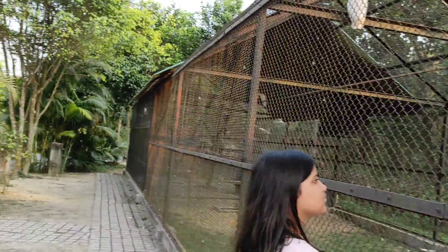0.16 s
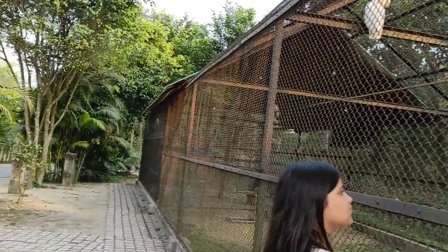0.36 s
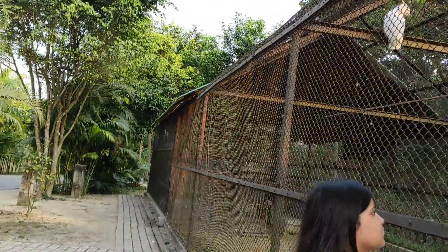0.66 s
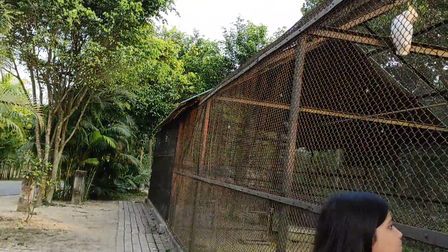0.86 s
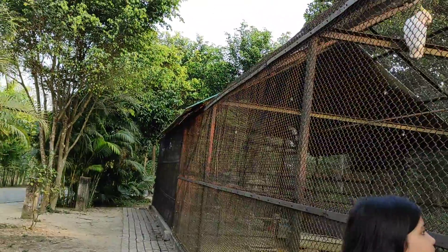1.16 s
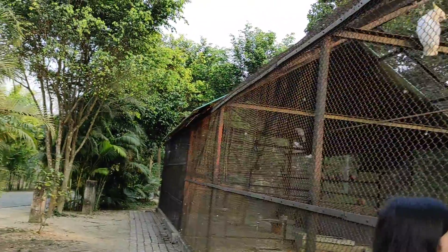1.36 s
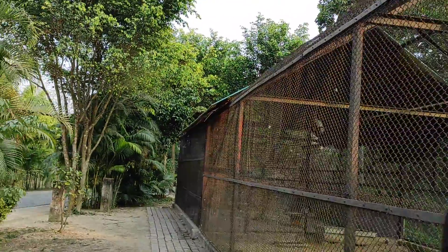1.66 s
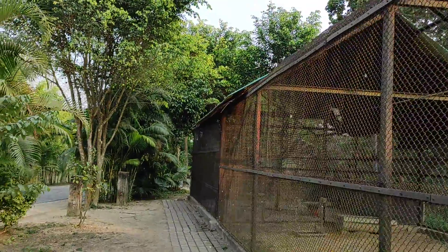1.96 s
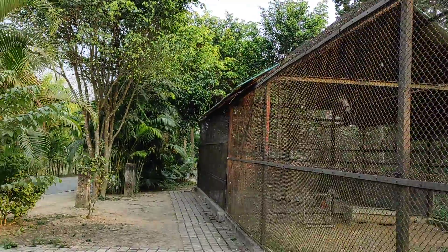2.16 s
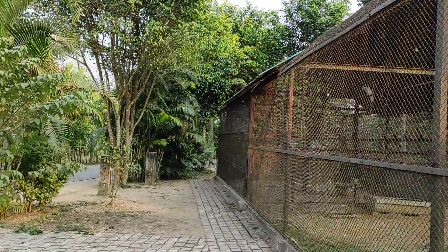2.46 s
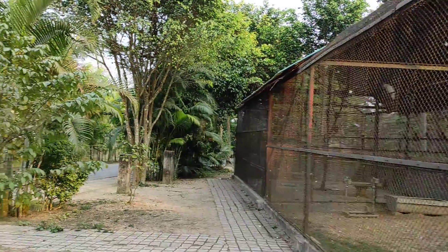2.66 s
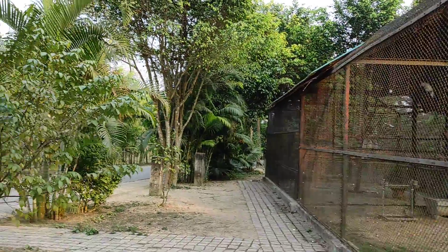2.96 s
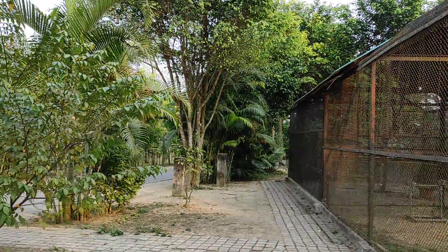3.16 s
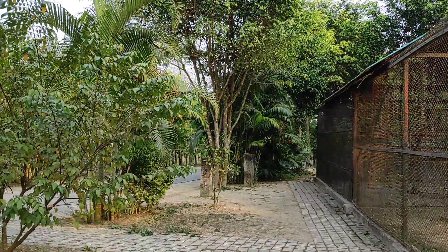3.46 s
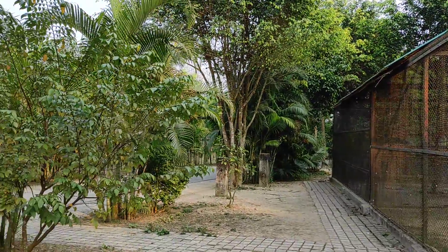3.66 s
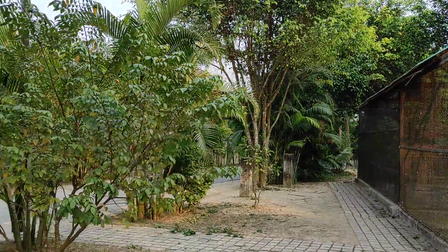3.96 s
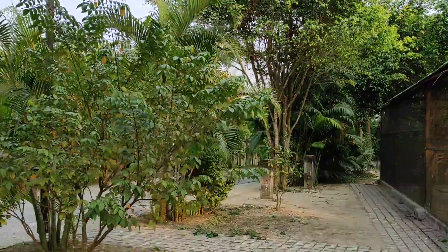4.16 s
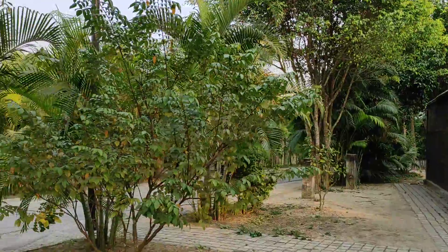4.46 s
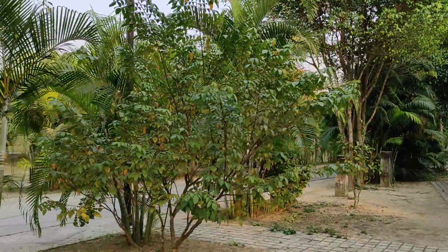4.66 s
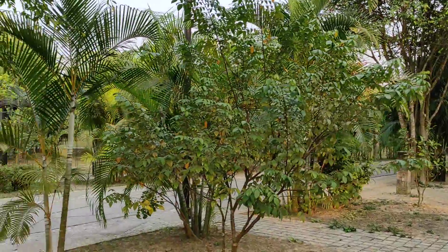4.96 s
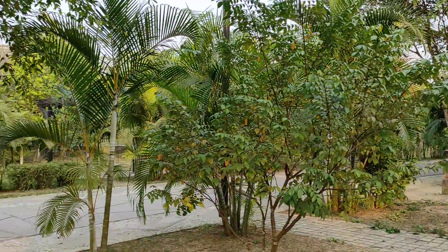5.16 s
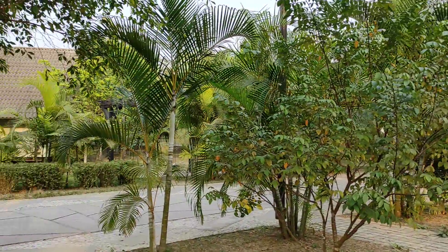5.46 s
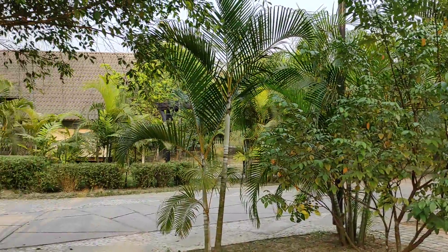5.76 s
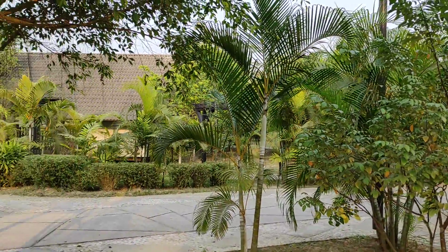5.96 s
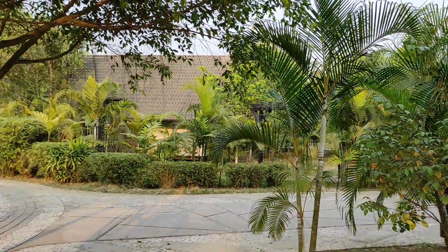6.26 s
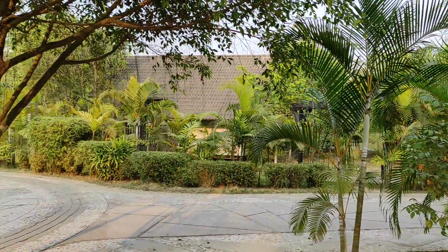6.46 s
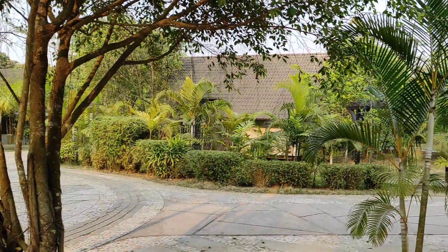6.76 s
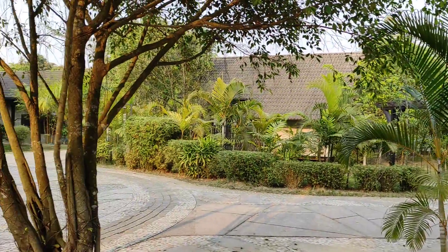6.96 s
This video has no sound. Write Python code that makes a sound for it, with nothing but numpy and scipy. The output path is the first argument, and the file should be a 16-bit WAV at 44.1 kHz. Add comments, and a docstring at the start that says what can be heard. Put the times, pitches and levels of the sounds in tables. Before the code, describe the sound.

In an outdoor aviary beside a garden, a large parrot gives one rising, raspy squawk, then after a pause repeats short, harsh two-step squawks about every three-quarters of a second. Small birds chirp briefly early on. Close dry ticks and one sharp snap come from right at the stereo microphone. Distant traffic, light wind and a faint far flock lie quietly underneath.

```python
"""An outdoor aviary with a garden around it, heard through the two microphone ports of a panning camera.
A parrot squawks (rasping scoop, high note, jump down, falling glide): harmonics and puffed noise, throat-filtered.
Small birds chirp in gliding harmonics. Close to the camera, ticks are noise bursts over a low thump
and one sharp snap is a handful of brief rings. Sparse echoes answer from cage, paving and trees.
Far off lie traffic, wind, a chattering flock and garden hiss, all shaped noise, and faint wavering tones."""
import sys
import numpy as np
from scipy import signal
from scipy.fft import rfft, irfft
from scipy.io import wavfile
from scipy.ndimage import uniform_filter1d

SR = 44100
rng = np.random.default_rng(int(sys.argv[2]) if len(sys.argv) > 2 else 0)


def file_out(sig):
    """Save sig as 16-bit WAV at sys.argv[1]."""
    # one column per channel
    cols = np.atleast_2d(sig).T
    # limit, then scale
    lim = np.clip(cols, -1, 1)
    pcm = np.round(lim * 32767).astype(np.int16)
    wavfile.write(sys.argv[1], SR, pcm)


N = 313110  # samples

# Parrot's throat, as heard: [f/Hz, relative level/dB]
THROAT = [(410, -75), (700, -28), (1460, -26.5), (1820, -21.5), (2560, -9.5), (3410, -4.5), (4800, -8.5),
          (5190, -10), (8760, 2), (10100, -12), (12200, -15.5), (13100, -34.5), (16000, -22)]
# First call, climbing to its note: [t/s, pitch f/Hz, level/dB before the port trim, noise re tone/dB,
# brightness/dB per harmonic]
FIRST_CALL = [(0.158, 1288, -57, 4, -8), (0.18, 1367, -44.5, 3.5, -7), (0.218, 1660, -42.5, 1, -9),
              (0.225, 1685, -39, -24.5, -5.5), (0.298, 1782, -35.5, -25.5, -4),
              (0.331, 2203, -37, -14.5, -4.5), (0.37, 2378, -34.5, -14.5, -5.5),
              (0.39, 2284, -28.5, -12, -4), (0.416, 2049, -25.5, -4, 2), (0.445, 1699, -23, -2, -4),
              (0.466, 1521, -39, 2, -1.5)]
# Short rasps: [start t/s, length/s, pitch f/Hz, level/dB before the port trim]
RASPS = [(1.097, 0.01105, 4160, -37), (1.108, 0.021, 4300, -36.5), (1.371, .1, 3050, -38.5),
         (1.487, 0.04, 2930, -45)]
RASP_NOISE_DB, RASP_TILT_DB, RASP_FADE_DB = 2, -1.5, -13  # noise re tone, dB per harmonic, level at the end
# Squawks: [start t/s; lengths/s of scoop, high note, held note, fall; f/Hz of high note, held note, end;
# level/dB before the port trim of scoop, high entry, high top, held note, fall;
# extra brightness of both notes/dB per harmonic]
SQUAWKS = [(2.852, 0.027, .03, .068, .092, 2475, 2351, 1500, -29.5, -33.5, -27, -28, -22, 1.32),
           (3.73, 0.039, .027, 0.051, 0.096, 3215, 2299, 1430, -27.5, -44, -26.5, -28, -22.5, 0.6),
           (4.475, 0.033, .032, 0.035, .084, 3283, 2332, 1451, -28, -31.5, -25, -27, -23.5, 0.94),
           (5.386, .055, 0.035, .034, .08, 3301, 2355, 1423, -29, -32.5, -22.5, -29.5, -23, -0.17),
           (6.198, .034, 0.036, 0.04, 0.077, 3270, 2321, 1524, -29.5, -35, -31, -32, -25, 0.042),
           (6.986, 0.034, .029, 0.058, .08, 3300, 2195, 1500, -29, -39, -32, -29.5, -24, 0.3)]
# Noise re tone by part of the squawk: [level/dB]
NOISE_DB = {"scoop": 2.0, "snap": -10, "high": -22, "held": -26, "break": -14, "fall": -7.5}
# Brightness by part of the squawk: [dB per harmonic]
TILT_DB = {"scoop": -2.5, "snap": -2.5, "high": -6, "held": -5, "break": -0.5, "fall": -1.2}
# The scoop is a low rasp that snaps up at its end; its levels are relative to the scoop level
SCOOP_FROM_HZ, SCOOP_TO_HZ, SNAP_UP_S = 800, 980, 0.013
SCOOP_ATTACK_S, SCOOP_START_DB, SCOOP_RISE_DB, SCOOP_END_DB = 0.007, -23.5, -13.5, -4.5
JUMP_S = 0.003
HIGH_SAG, HELD_RISE_DB, HELD_SAG = 0.1, -3, 0.015  # notes swell while their pitch sags by a share
# Levels relative to the fall level; peak and end of hold as shares of the fall's length
FALL_ENTRY_DB, FALL_PEAK, FALL_HOLD, FALL_END_DB = 0.5, 0.409, 0.804, -17
FALL_BEND = 1.35  # exponent above 1: the glide starts gently and steepens

# Small birds: [start t/s, length/s, from f/Hz, to f/Hz, level/dB of harmonics 1, 2, 3 before trims]
CHIRPS = [(1.104, 0.024, 4544, 3705, -52, -67, -78), (1.193, 0.029, 3617, 3843, -45, -37, -48),
          (1.222, 0.0289, 3910, 3140, -44, -37.5, -53), (2.324, .07, 1890, 1970, -66, -67, -80),
          (1.36, 0.015, 1708, 1945, -56, -70, -53), (1.427, 0.061, 2280, 2410, -55, -52, -61),
          (1.482, 0.028, 2570, 2840, -54, -50, -48)]
# Lead of the left port as the camera turns: [t/s, lead/samples]
BIRD_LEAD = [(0, 20.7), (4.5, 18.6), (5.5, 13.1), (6.2, 8.8), (7.1, 4.3)]
# Balance of the birds, before a fixed lean to the left: [t/s, left-right/dB]
BIRD_PAN = [(0.3, -2.5), (1.4, -7), (2.9, -1), (4.5, -2.5), (5.9, -3), (7.1, -2)]

SNAP_S = 0.8884
# Rings of the sharp snap: [f/Hz, left level/dB, right level/dB, half length to 1/e/ms]
SNAP = [(553, -29, -29, 2.6), (1800, -23, -14.5, 0.9), (2890, -14, -11.5, 1.0), (4250, -23, -15, 0.7),
        (5840, -20, -13, 0.6), (6970, -16, -10, 1.0), (8470, -7, -10.5, 1.1), (11600, -29, -29, .9)]
# Ticks: [t/s, level/dB before trim, thump re burst/dB before trim, left-right/dB before the camera body's
# shading, t60/s (floor 0.004), brightness/dB per octave]
TICKS = [(0.2313, -30, -11.5, -3.5, 0.01, -3), (0.8924, -13, -16, -7, 0.0086, 3),
         (1.705, -50.5, -0.5, 7, 0.0086, 0), (1.73, -45, -22, -8, 0.0066, 4),
         (1.7474, -38.5, -16, 4, 0.0028, 0.5), (1.99, -48, -25, 4, 0.0072, 3),
         (2.024, -43, -27, 2, 0.0064, 2), (2.3987, -27.5, -13.5, 1, 0.0041, 1),
         (3.9606, -30.5, -16, -3, 0.005, -14), (4.1491, -37.5, -12, 8, 0.0064, -1),
         (4.1557, -33.5, -10.5, -9, 0.0088, 3.5), (4.2098, -38, -31, 5.5, 0.0054, 5.5),
         (4.7293, -34.5, -9.5, -5, 0.0099, 6), (5.1045, -43, -17, 3, 0.0069, -5),
         (5.1535, -52, -25, 13, 0.0078, 8), (6.6358, -51, -20, 2, 0.0083, 0),
         (6.6976, -45, -13, 3, 0.01, 2.5)]
# Burst of a tick: [f/Hz, relative level/dB]
TICK_SPECTRUM = [(590, -52), (1000, -20.5), (1730, -9.5), (2030, -6), (2840, -6.5), (3300, -15),
                 (4020, -12), (5020, -12.5), (8260, -8.5), (10800, -19.5), (16000, -31)]
# Modes of a tick's thump: [f/Hz, relative level/dB, t60/s]
THUMP = [(340, 8.5, 0.031), (543, 16, 0.02), (730, 10, 0.022)]
# The camera body shades the ports by band: [f/Hz, left-right level/dB]
TICK_LEAN = [(2000, 7.5), (4000, 0), (8500, 10.5)]

# Late echoes of the yard: [f/Hz, t60/s]
YARD = [(1000, 0.65), (4000, 0.64), (9000, 0.42)]
# Faint wavering tones: [start t/s, end t/s, centre f/Hz, level/dB]
WHISTLES = [(3.646, 3.79, 1060, -63), (5.073, 5.753, 1107, -68.5)]

HISS_DB, CHATTER_DB, WIND_DB = -61.0, -67.5, -57.5  # steady levels before the background's common trim
# Swells of the hiss: [middle t/s, length/s (four sigma), level/dB before the common trim]
HISS_SWELLS = [(0.0, .08, -58.5), (1.035, .1, -50), (1.271, 0.55, -54), (1.757, 0.1, -53.5),
               (1.999, 0.074, -51.5), (2.407, 0.13, -53), (4.183, 0.18, -58.5), (5.8, 0.38, -59),
               (6.613, 0.18, -63)]
# Calls from the far flock: [middle t/s, length/s (four sigma), level/dB before the common trim]
FAR_CALLS = [(0.0, .08, -67), (1.3, 0.5, -54), (2.02, 0.13, -59.5), (2.38, 0.29, -54), (2.622, .25, -63),
             (4.3, 0.069, -55), (5.02, 0.15, -54.5), (5.25, 0.13, -61), (5.77, .3, -54), (6.85, 0.24, -63)]
# Gusts of wind: [middle t/s, length/s (four sigma), level/dB before the common trim]
GUSTS = [(0.1, .8, -59), (1.2, 0.29, -62), (3.2, 1.6, -55.5), (4.65, 0.57, -51.5), (6.4, 0.71, -57),
         (7.1, 0.58, -47)]
# Distant traffic: [t/s, rumble level/dB before the common trim]
TRAFFIC = [(0.0, -53), (1.1, -56), (3.4, -53.5), (4.07, -51.5), (4.6, -57), (7.1, -57)]
# Hiss of the garden: [f/Hz, relative level/dB]
AIR = [(590, -47), (1000, -8), (1690, -4.5), (2150, -12.5), (3230, -20.5), (5830, -4.5), (6330, -9.5),
       (7790, -0.5), (10700, -19), (12500, -20), (16000, -27)]
# Chatter of the far flock: [centre f/Hz, width/Hz, relative level/dB]
CHATTER = [(2140, 280, -2.5), (2550, 480, -6.5), (3740, 460, -4.5)]
# Traffic rumble: [f/Hz, relative level/dB]
RUMBLE = [(12, -43.5), (20, -32), (59, -3), (135, 0), (225, 0), (319, -4), (542, -11.5), (594, -7),
          (640, -11.5), (940, -15.5), (1600, -27), (2080, -55), (3520, -120)]
# Likeness of the background at the two ports: [f/Hz, correlation]
PORT_LIKENESS = [(60, 0.49), (180, 1), (550, 0.17), (1650, -0.098), (4970, 0.17), (15000, -0.16)]
# Balance of the background: [f/Hz, left-right/dB]
PORT_LEAN = [(60, 4.5), (180, 5.5), (550, 3.5), (1650, 1), (4970, -3.5), (15000, 5.5)]

# Overall treble balance, a steep step down between 9.3 and 9.9 kHz: [f/Hz, level/dB]
TREBLE_BALANCE = [(9300, -1.5), (9900, -11)]
EDGE_HZ = 16000  # upper band limit


def parrot():
    """A wavering membrane: harmonics weighted by the throat, plus noise puffed once a cycle."""
    t = np.arange(N) / SR
    level, noise_db, tilt_db = np.zeros((3, N))
    calls = [FIRST_CALL] + [rasp(*row) for row in RASPS] + [squawk(*row) for row in SQUAWKS]
    for rows in calls:
        start = rows[0][0]
        _, call_db, call_noise_db, call_tilt_db = unroll(rows)
        add(level, start, gain_of(call_db))
        add(noise_db, start, call_noise_db)
        add(tilt_db, start, call_tilt_db)
    level = uniform_filter1d(level, size=120)
    # the throat changes slowly
    noise_db, tilt_db = uniform_filter1d(np.array([noise_db, tilt_db]), size=500, axis=1)
    noise_gain = gain_of(noise_db)
    hz = np.interp(t, *np.vstack(calls).T[:2])
    waver, bursts, noise = rng.standard_normal((3, N))
    # a noisier voice is also less steady in pitch
    rough = 0.00522 + 0.037 * noise_gain
    turns = np.cumsum(hz * (1 + rough * evened(uniform_filter1d(waver, 60)))) / SR

    on = level > 0
    k = np.arange(1, 13)[:, None]  # harmonic numbers
    harmonic_hz = k * hz[on]
    weights = gain_of(read(THROAT, harmonic_hz) + tilt_db[on] * k) * (harmonic_hz < EDGE_HZ)
    harmonics = (weights * np.cos(2 * np.pi * k * turns[on])).sum(0)
    tone = np.zeros(N)
    tone[on] = harmonics * np.sqrt(2 / (weights ** 2).sum(0))

    cycle_puff = 0.52 + np.exp(-(turns % 1) / 0.67)
    flutter = gain_of(5.6 * evened(uniform_filter1d(bursts, 90)))
    breath = evened(colour(cycle_puff * flutter * noise, THROAT))
    return level * (tone + noise_gain * breath) / np.sqrt(1 + noise_gain ** 2)


def squawk(start, scoop, high, held, fall, high_hz, held_hz, end_hz,
           scoop_db, entry_db, high_db, held_db, fall_db, bright_db):
    """Voice controls of one squawk: t/s, pitch f/Hz, level/dB, noise/dB, brightness/dB per harmonic."""
    up, jump, drop, end = start + np.cumsum([scoop, high, held, fall])
    drop_hz = held_hz * (1 - HELD_SAG)

    def glide(share):
        """Pitch at a share of the fall."""
        return drop_hz * (end_hz / drop_hz) ** share ** FALL_BEND

    parts = {
        "scoop": [(start, SCOOP_FROM_HZ, scoop_db + SCOOP_START_DB),
                  (start + SCOOP_ATTACK_S, SCOOP_FROM_HZ, scoop_db + SCOOP_RISE_DB),
                  (up - SNAP_UP_S, SCOOP_TO_HZ, scoop_db)],
        "snap": [(up - JUMP_S, 0.8 * high_hz, scoop_db + SCOOP_END_DB)],
        "high": [(up, high_hz, entry_db),
                 (up + 0.55 * high, high_hz * (1 - 0.25 * HIGH_SAG), high_db),
                 (jump, max(high_hz * (1 - HIGH_SAG), held_hz), high_db)],
        "held": [(jump + JUMP_S, held_hz, held_db + HELD_RISE_DB),
                 (drop, drop_hz, held_db)],
        "break": [(drop + FALL_PEAK / 2 * fall, glide(FALL_PEAK / 2), fall_db + FALL_ENTRY_DB)],
        "fall": [(drop + FALL_PEAK * fall, glide(FALL_PEAK), fall_db),
                 (drop + FALL_HOLD * fall, glide(FALL_HOLD), fall_db),
                 (end, end_hz, fall_db + FALL_END_DB)]}
    controls = []
    for name, rows in parts.items():
        tilt_db = TILT_DB[name] + bright_db * (name in ("high", "held"))
        controls += [(*row, NOISE_DB[name], tilt_db) for row in rows]
    return controls


def rasp(start, length, hz, db):
    """Voice controls of a noisy burst that starts hard and fades."""
    return [(start + share * length, hz, db + fade_db, RASP_NOISE_DB, RASP_TILT_DB)
            for share, fade_db in ((0, -3.0), (0.25, 0), (1, RASP_FADE_DB))]


def chirps():
    """Small birds whistle: three slightly unsteady harmonics on a glide."""
    out = np.zeros(N)
    for start, length, from_hz, to_hz, *levels in CHIRPS:
        hz = np.linspace(from_hz, to_hz, round(length * SR))
        waver = evened(uniform_filter1d(rng.standard_normal(4000), 80))[:len(hz)]
        turns = np.cumsum(hz * (1 + 0.012 * waver)) / SR
        sound = sum(gain_of(db + 5.5) * np.sin(2 * np.pi * k * turns) for k, db in enumerate(levels, 1))
        add(out, start, sound * signal.windows.tukey(len(hz), 0.6))
    return out


def snap():
    """A few brief rings with bell-shaped envelopes close to the camera; longer ones peak later."""
    t = np.arange(-200, 1200) / SR
    out = np.zeros((2, N))
    for (hz, left_db, right_db, ms), phase in zip(SNAP, rng.random(len(SNAP))):
        bell = np.exp(-(1000 * t / ms - 0.64 * (ms - 0.9)) ** 2)
        ring = bell * np.sin(2 * np.pi * (hz * t + phase))
        ports = np.array([np.roll(ring, 12), ring])  # the left port hears it 12 samples later
        add(out, SNAP_S + t[0], ports * gain_of([[left_db], [right_db]]))
    return out


def ticks():
    """Close to the camera, each tick is a short noise burst over a low thump of decaying modes."""
    out = np.zeros((2, N))
    t = np.arange(4096) / SR
    modes = sum(gain_of(db - 60 * t / t60) * np.sin(2 * np.pi * hz * t) for hz, db, t60 in THUMP)
    thump = modes * (1 - np.exp(-t / 0.0017))
    noises = rng.standard_normal((len(TICKS), 4096))
    for (s, db, thump_db, pan_db, t60, tilt_db), noise in zip(TICKS, noises):
        spectrum = [(hz, level_db + tilt_db * np.log2(hz / 5000)) for hz, level_db in TICK_SPECTRUM]
        swell = (t / 0.0019) ** 2 * gain_of(-60 * t / max(t60, 0.004))  # builds up briefly, then dies
        burst = evened(colour(noise, spectrum)) * swell / swell.max()
        sound = gain_of(db - 5.5) * (burst + gain_of(thump_db - 4.5) * thump)
        # the right port is nearer
        ports = np.array([np.roll(colour(sound, TICK_LEAN), 12), sound])
        add(out, s, ports * gain_of([[pan_db / 2], [-pan_db / 2]]))
    return out


def yard(x):
    """Sparse echoes of random sign from cage, paving and trees, dying by band."""
    taps = np.zeros((2, SR))
    at = np.arange(200, SR - 20, 20) + rng.integers(0, 20, (2, (SR - 201) // 20))
    np.put_along_axis(taps, at, rng.choice([-1., 1.], at.shape), 1)
    hz, t, z = signal.stft(taps, SR, nperseg=256)
    late = gain_of(-60 * t / read(YARD, hz)[:, None])
    early = gain_of(18.5 - 60 * t / 0.058)  # near echoes die first
    tail = signal.istft(z * (late + early), SR, nperseg=256)[1]
    return signal.fftconvolve(x, tail / np.linalg.norm(tail[0]), axes=1)[:, :N]


def whistles():
    """Faint, slightly wavering tones, alike at both ports."""
    out = np.zeros(N)
    for start, end, hz, db in WHISTLES:
        t = np.arange(0, end - start, 1 / SR)
        tone = np.sin(2 * np.pi * hz * t + 2.0 * np.sin(9.0 * t))
        add(out, start, gain_of(db) * tone * signal.windows.tukey(len(t), 0.3))
    return out


def background():
    """Hiss, far chatter, traffic rumble and wind: random spectra with drifting patches."""
    frames = N // 256 + 5
    hz = np.fft.rfftfreq(1024, 1 / SR)
    t = np.arange(frames) * 256 / SR
    a, b, c, d, patches = rng.standard_normal((frames, 513, 5)).T
    patches = evened(uniform_filter1d(uniform_filter1d(patches, 10, 0), 10, 1))
    patches = patches * (hz > 900)[:, None]  # no patches at 900 Hz and below

    hiss = gain_of(read(AIR, hz)) * (hz > 900)
    flock = sum(gain_of(db) * np.exp(-0.5 * ((hz - f) / width) ** 2) for f, width, db in CHATTER)
    traffic = gain_of(read(RUMBLE, hz)) * (hz < 1600)
    wind = gain_of(-hz / 3.2)
    traffic_power = gain_of(np.interp(t, *np.transpose(TRAFFIC))) ** 2
    layers = [(hiss, swells(t, HISS_DB, HISS_SWELLS)), (flock, swells(t, CHATTER_DB, FAR_CALLS)),
              (traffic, traffic_power), (wind, swells(t, WIND_DB, GUSTS))]
    power = sum(np.outer(shape ** 2 / (shape ** 2).sum(), level) for shape, level in layers)

    # the right port shares part of the left port's noise
    same = np.clip(read([(25, 0.36)] + PORT_LIKENESS, hz), -1, 1)[:, None]
    left = a + 1j * b
    z = np.array([left, same * left + np.sqrt(1 - same ** 2) * (c + 1j * d)])
    z *= np.sqrt(power) * gain_of(np.outer([0.5, -0.5], read(PORT_LEAN, hz)))[..., None]
    z *= gain_of(2.2 * patches)
    return gain_of(3.5) * signal.istft(z, nperseg=1024, noverlap=768)[1][:, :N]


def swells(t, steady_db, rows):
    """Power of a steady level with bell-shaped swells on top."""
    bells = sum(gain_of(db) ** 2 * np.exp(-(4 * (t - s) / length) ** 2 / 2) for s, length, db in rows)
    return gain_of(steady_db) ** 2 + bells


def gain_of(db):
    """Decibels to gain."""
    return 10 ** (np.asarray(db) / 20)


def evened(x):
    """Scales to rms 1."""
    return x / np.sqrt(np.mean(x ** 2) + 1e-20)


def read(points, hz):
    """Reads a table on a log-frequency axis."""
    f, value = np.transpose(points)
    return np.interp(np.log(hz + 1), np.log(f + 1), value)


def colour(x, spectrum):
    """Filters by a spectrum table."""
    return irfft(rfft(x) * gain_of(read(spectrum, np.fft.rfftfreq(len(x), 1 / SR))), len(x))


def unroll(rows):
    """Columns of a curve at every sample."""
    s, *columns = np.transpose(rows)
    t = np.arange(s[0], s[-1], 1 / SR)
    return [np.interp(t, s, c) for c in columns]


def add(mix, s, sound):
    """Mixes a sound in at time s."""
    part = mix[..., round(s * SR):][..., :sound.shape[-1]]
    part += sound[..., :part.shape[-1]]


def scene():
    """The birds reach the left port first; birds, ticks and snap echo in the yard."""
    n = np.arange(N)
    lead, pan_db = (np.interp(n / SR, *np.transpose(curve)) for curve in (BIRD_LEAD, BIRD_PAN))
    later = np.clip(n - np.round(lead).astype(int), 0, N - 1)
    port_gains = gain_of([pan_db / 2 + 3.5, 0.5 - pan_db / 2])
    big, small = (np.array([bird, bird[later]]) * port_gains for bird in (parrot(), chirps()))
    near = ticks() + snap()
    echoes = yard(big + gain_of(-1.0) * small + gain_of(-8.5) * near)
    return big + small + near + echoes + background() + whistles()


def record(dry):
    """The top is darkened above 9.3 kHz; then the band limit."""
    darkened = np.array([colour(x, TREBLE_BALANCE) for x in dry])
    low_pass = signal.firwin(511, EDGE_HZ, window=("kaiser", 9), fs=SR)
    return signal.oaconvolve(darkened, low_pass[None], "same")


dry = scene()
out = record(dry)
file_out(out)
```